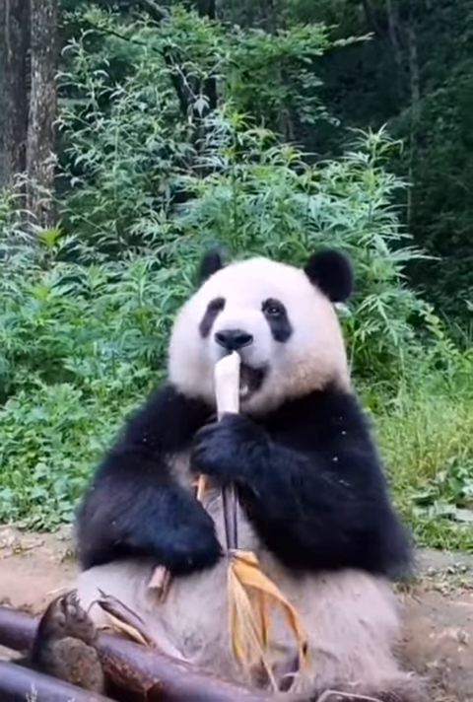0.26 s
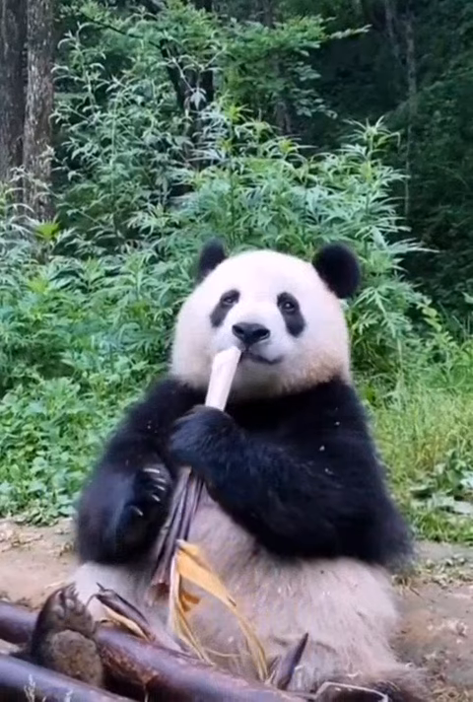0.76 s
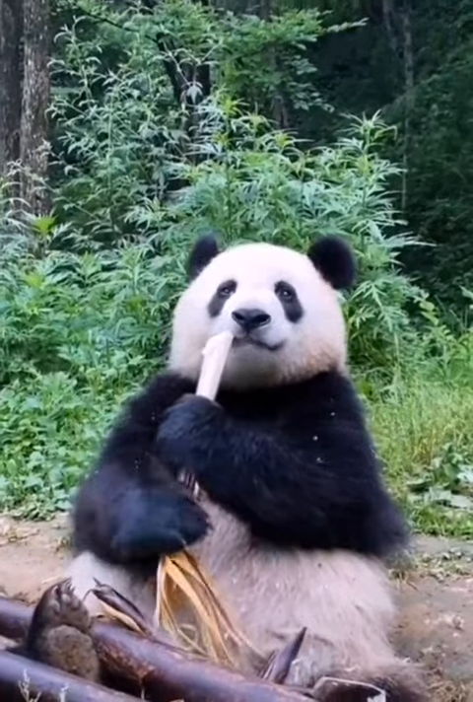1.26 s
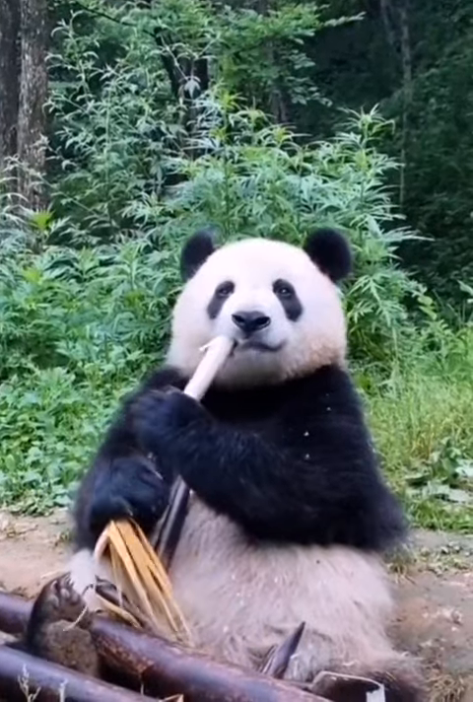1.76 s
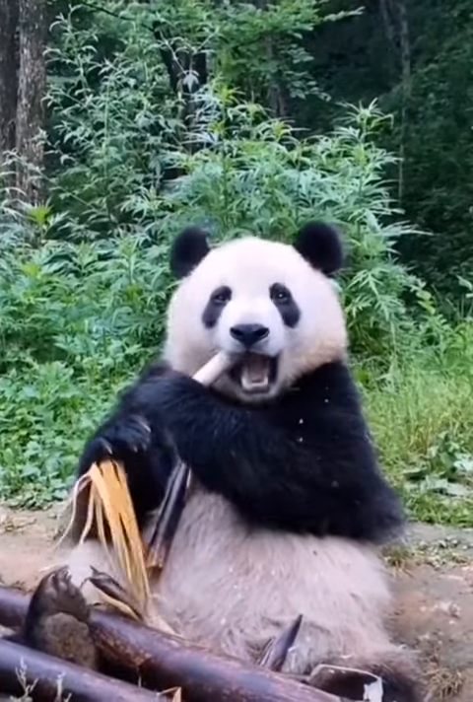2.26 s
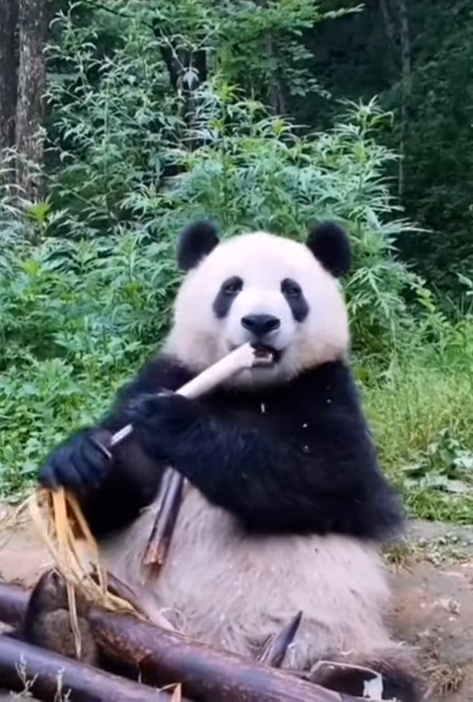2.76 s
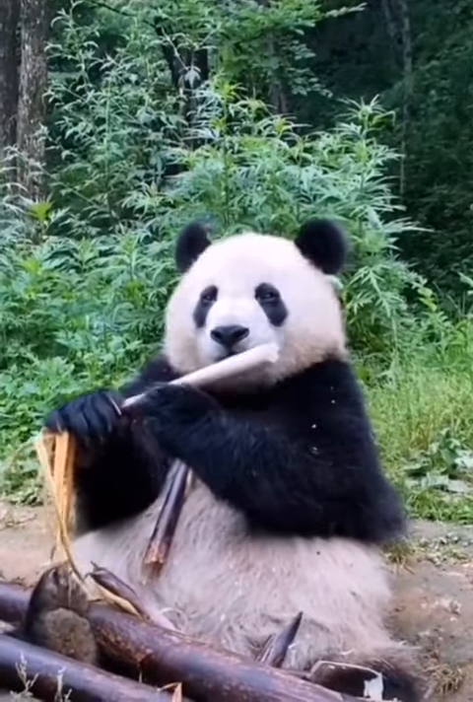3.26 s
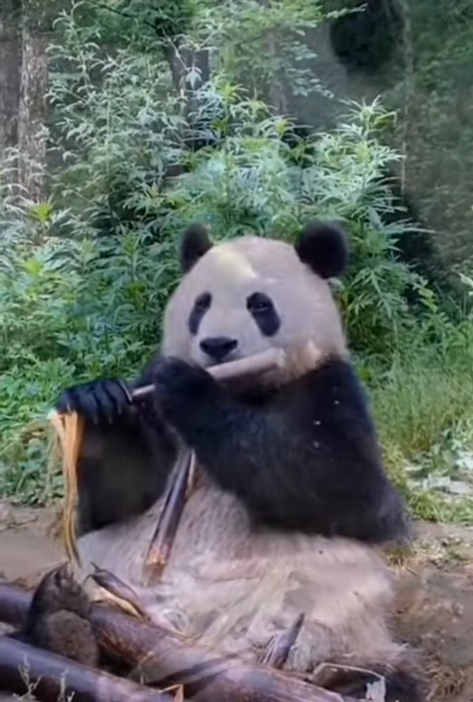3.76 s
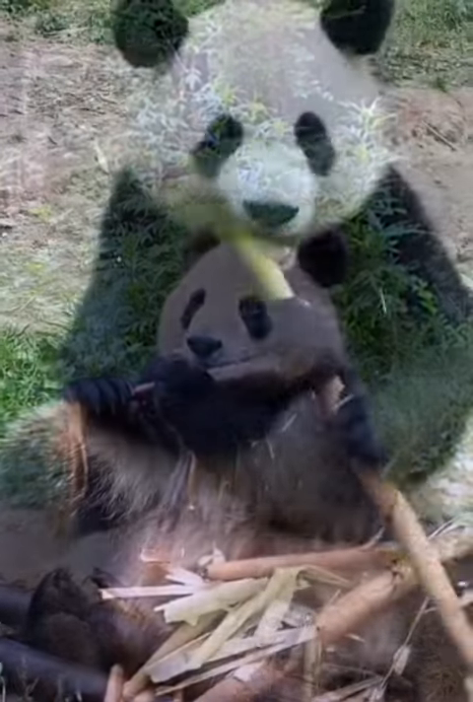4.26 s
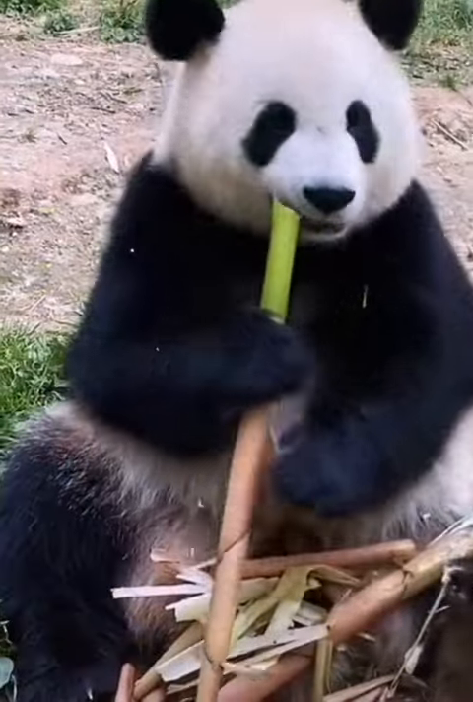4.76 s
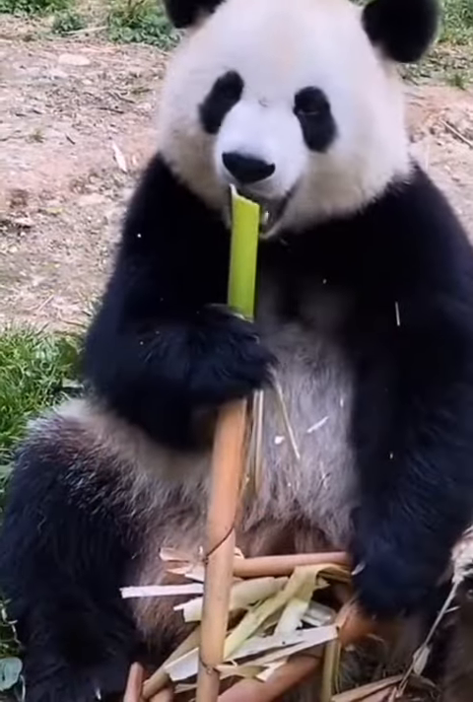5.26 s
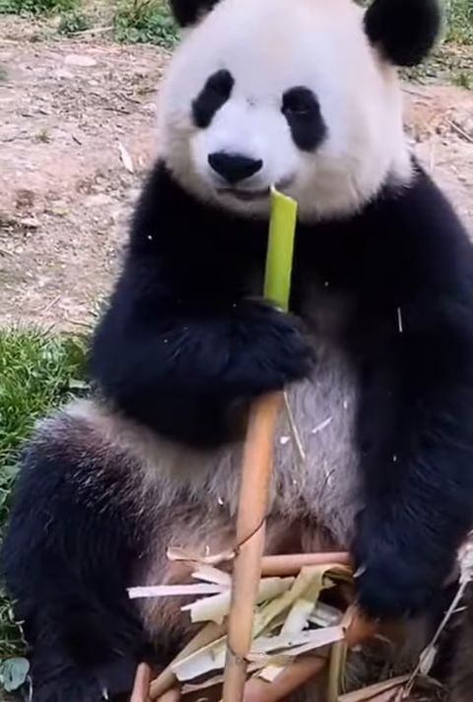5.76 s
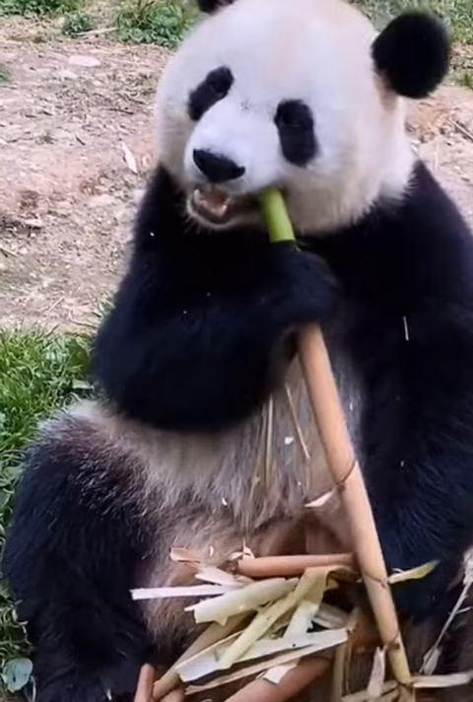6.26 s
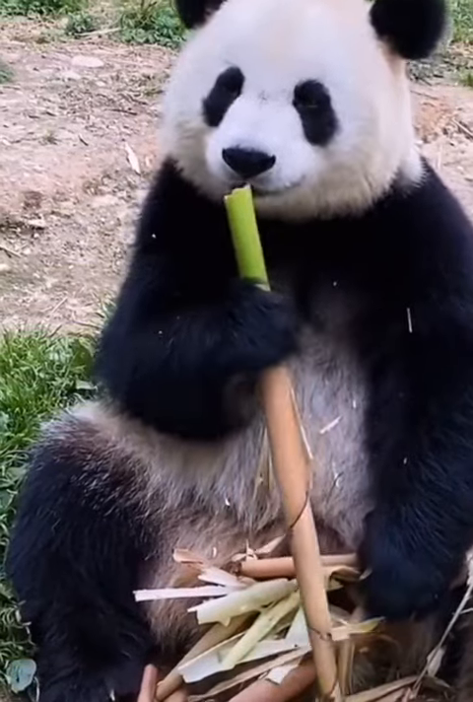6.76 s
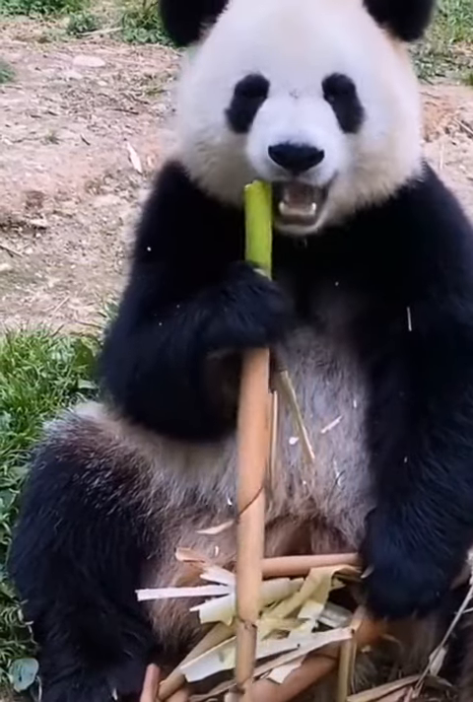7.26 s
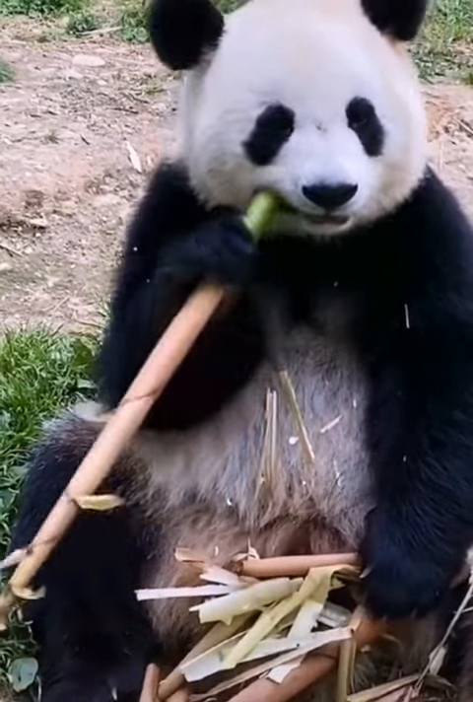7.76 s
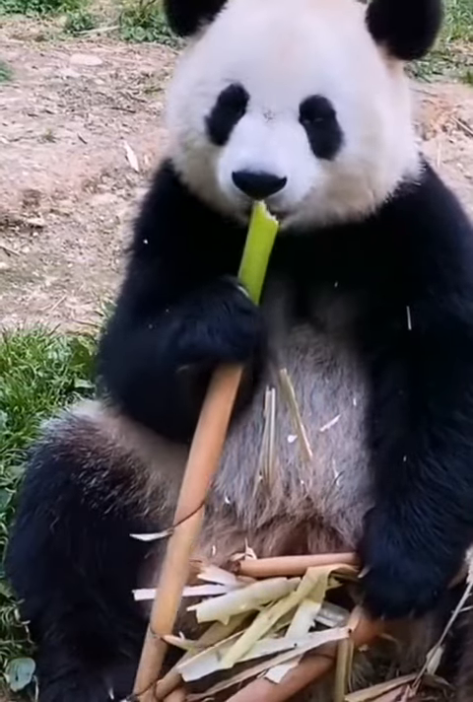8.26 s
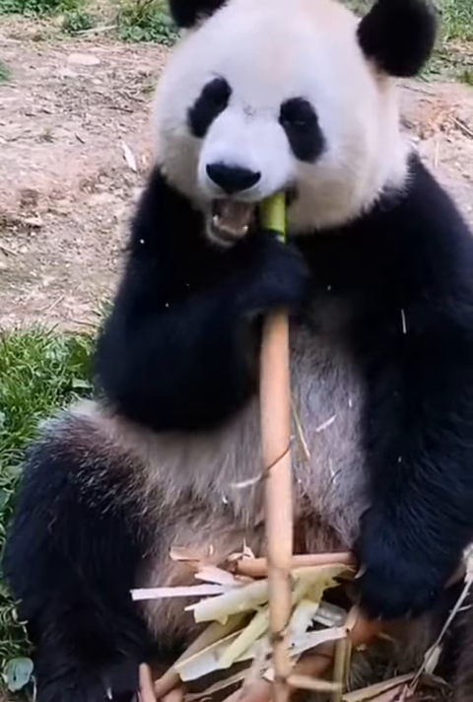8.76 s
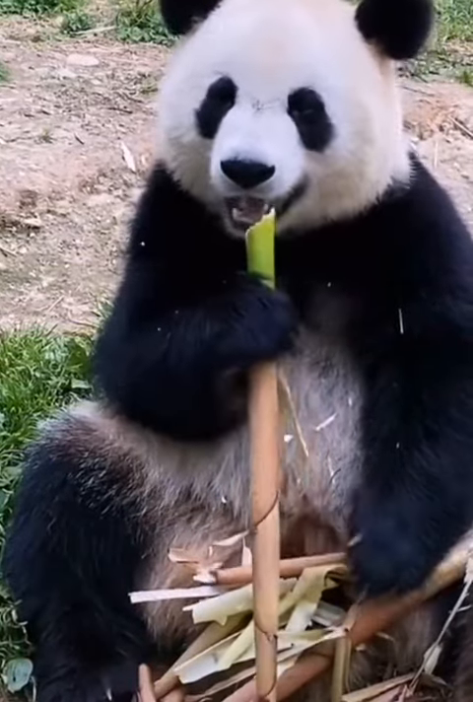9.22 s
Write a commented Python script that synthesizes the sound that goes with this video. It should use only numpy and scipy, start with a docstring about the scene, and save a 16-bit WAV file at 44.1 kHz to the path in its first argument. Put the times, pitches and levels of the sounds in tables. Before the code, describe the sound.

Close, dry snapping and splintering of bamboo in a panda's jaws, with faint wet munching, brief nose puffs, and a deep boom midway.

```python
"""Outdoor hiss opens the scene as filtered noise; at once a panda bites and chews bamboo close by.
Torn fibres and snaps are impulse clusters exciting the resonances of stalk, mouth and splinters.
Low rumbles, noise under swelling and decaying envelopes, begin within the first half second.
Nose puffs (low noise) follow until about 4 s, with faint hollow tones (wavering sinusoids) at times.
The hiss sinks near 2 s and returns stronger; the loudest rumbles come after 5.6 s, as chewing goes on."""
import sys
import numpy as np
from scipy import signal
from scipy.fft import rfft, irfft, next_fast_len
from scipy.io import wavfile
from scipy.ndimage import uniform_filter1d

SR = 44100
rng = np.random.default_rng(int(sys.argv[2]) if len(sys.argv) > 2 else 0)


def waveform_to_disk(signal):
    """Save audio, clipped to [-1, 1], as 16-bit WAV at the path in sys.argv[1]."""
    frames = np.transpose(np.atleast_2d(signal))
    scaled = np.clip(frames, -1, 1) * 32767
    samples = np.round(scaled).astype(np.int16)
    wavfile.write(sys.argv[1], SR, samples)


N = 418509
LEFT_RIGHT = np.array([[1], [-1]])  # opposite polarity in the two channels: sound at the sides


def undb(db):
    """Logarithmic level: decibels to amplitude gain."""
    return 10 ** (np.asarray(db) / 20)


def unit(x):
    """Power normalisation: scale to rms 1."""
    return x / np.sqrt(np.mean(x ** 2) + 1e-20)


def curve(rows):
    """Envelope: gain interpolated in dB through (time [s], level [dB]); silent outside the rows."""
    times, levels = np.transpose(rows)
    level_db = np.interp(np.arange(N) / SR, times, levels, -120, -120)
    return uniform_filter1d(undb(level_db), size=256)


def colour(x, points):
    """Minimum-phase filtering through (frequency [Hz], gain [dB]), by folding the cepstrum."""
    n = 2 * next_fast_len(len(x) // 2 + 1)
    hz, db = np.transpose(points)
    log_hz = np.log(np.maximum(np.arange(n // 2 + 1) * SR / n, 1))
    beyond = np.abs(log_hz - np.clip(log_hz, np.log(hz.min()), np.log(hz.max())))
    log_gain = np.log(undb(np.interp(log_hz, np.log(hz), db)))
    log_gain = log_gain - np.minimum(4 * beyond, 8)  # roll off outside the points
    cepstrum = irfft(log_gain)
    cepstrum[1:n // 2] *= 2
    cepstrum[n // 2 + 1:] = 0
    return irfft(rfft(x, n) * np.exp(rfft(cepstrum)))[:len(x)]


def ring(x, hz, width_hz):
    """Damped resonance: a second-order peak with gain 1 at its centre."""
    b, a = signal.iirpeak(hz, hz / width_hz, fs=SR)
    return signal.lfilter(b, a, x)


def sweep(x, hz, width_hz):
    """Moving resonance: shift the centre to 0 Hz, low-pass, shift back; gain 1 at the centre."""
    turn = np.exp(2j * np.pi * np.cumsum(hz) / SR)
    keep = np.exp(-np.pi * width_hz / SR)
    smoothed = signal.lfilter([1 - keep], [1, -keep], x * turn.conj())
    return 2 * (turn * smoothed).real


def noise(points):
    """Spectral shaping: white noise coloured, then set to rms 1."""
    return unit(colour(rng.standard_normal(N), points))


def walk(rate):
    """Slow random modulation of rms 1; rate is in steps per second."""
    step = max(int(SR / rate), 1)
    held = np.repeat(rng.standard_normal(N // step + 1), step)
    return unit(uniform_filter1d(held, step)[:N])


def add(out, x, start):
    """Superposition: mix x into out from the time start."""
    i = int(round(start * SR))
    x = x[max(-i, 0):max(N - i, 0)]
    out[max(i, 0):max(i, 0) + len(x)] += x


# still air: (frequency [Hz], gain [dB])
AIR_SPECTRUM = [(25, -8), (60, 3.5), (100, 7), (180, 4.5), (260, -4.5), (480, -2), (750, -25), (4200, -32),
                (6300, -71), (7600, -49), (9500, -24.5), (15000, -38)]
AIR_DB = -46
# central hiss: (frequency [Hz], gain [dB])
HISS_SPECTRUM = [(21, -28), (35, -39), (59, 3), (91, -5.5), (253, -1), (314, -6.5), (426, -4.5),
                 (507, -4.5), (553, -5.5), (717, -6), (931, -5), (1130, -8.5), (1230, -6), (6300, -14.5),
                 (8190, -102), (13900, -120)]
# hiss at the sides: (frequency [Hz], gain [dB]), and its level against the central hiss
WIDE_SPECTRUM = [(100, -31), (250, -4.5), (450, 10), (1000, 7), (1900, 4.5), (2600, -35), (5000, -54),
                 (6300, -6), (8000, -28)]
HISS_WIDE_DB = -15.5
# envelope of the central and wide hiss: (time [s], level [dB])
HISS_ENVELOPE = [(0, -42.5), (.6, -40.5), (1.2, -45.5), (1.8, -47), (1.92, -54.5), (2.06, -53), (2.2, -60),
                 (2.35, -36), (2.5, -45.5), (3.33, -46.5), (3.5, -36.5), (3.7, -33.5), (3.725, -45),
                 (3.77, -39), (4.17, -36.5), (4.4, -37), (4.7, -36.5), (5.05, -39), (5.5, -35), (5.85, -42),
                 (6.15, -40), (6.4, -35.5), (7.05, -37.5), (7.7, -36.5), (8.9, -37), (9.49, -40)]
# airy top: (frequency [Hz], gain [dB])
TOP_SPECTRUM = [(5500, -23), (6200, -10), (6900, 22), (7500, 0.5), (8400, -9), (9600, 15.5), (12000, 14),
                (14500, 7.5), (16000, -39)]
# envelope of the top, before TOP_DB: (time [s], level [dB])
TOP_ENVELOPE = [(0, -54), (.6, -59), (.95, -75), (1.5, -58), (2, -75), (2.3, -39), (2.6, -60), (3.45, -73),
                (3.8, -58), (5.2, -62), (6.1, -62), (6.6, -53.5), (7.1, -51), (7.55, -60.5), (8.1, -53.5),
                (8.5, -53), (8.68, -61), (9.1, -53), (9.49, -57)]
# added swells of the top, before TOP_DB: (middle [s], length [s], peak level [dB])
TOP_SURGES = [(2.72, .14, -54), (3.16, .18, -58), (3.4, .05, -43), (3.84, 0.1, -63), (4.26, 0.22, -45),
              (4.69, .16, -48), (5.85, 0.16, -56), (6.35, 0.27, -50), (6.48, 0.13, -44.5),
              (6.88, 0.35, -54), (7.67, .08, -36), (7.93, 0.23, -47), (8.97, .16, -43.5)]
TOP_DB = -2.0


def outdoors():
    """Broadband noise: steady air, a wavering hiss, an airy top; opposite-polarity parts give width."""
    air = undb(AIR_DB) * noise(AIR_SPECTRUM)
    waver = undb(.9 * walk(7) + .7 * walk(45))
    hiss = noise(HISS_SPECTRUM) * waver + undb(HISS_WIDE_DB) * noise(WIDE_SPECTRUM) * LEFT_RIGHT
    top = noise(TOP_SPECTRUM) + undb(-1.0) * noise(TOP_SPECTRUM) * LEFT_RIGHT
    top = top * undb(1.2 * walk(16))
    top_gain = curve(TOP_ENVELOPE)
    for middle, length_s, db in TOP_SURGES:
        surge = undb(db) * signal.windows.hann(max(int(length_s * SR), 64))
        add(top_gain, surge, middle - length_s / 2)
    return air + hiss * curve(HISS_ENVELOPE) + top * top_gain * undb(TOP_DB)


def fibres(count, per_s, scatter_db):
    """Random impulse process: lone snaps at chance moments, many small and a few large."""
    chance, size, sign = rng.random((3, count))
    strength = undb(-scatter_db * np.log(np.maximum(size, .02)))
    return (chance < per_s / SR) * strength * np.sign(sign - .5)


# body of the stalk: (frequency [Hz], gain [dB])
STALK_COLOUR = [(600, -6.5), (1100, -29.5), (1500, 4), (2900, 3), (3700, -6.5), (6000, -43.5)]
# cavity of the mouth: (frequency [Hz], gain [dB])
MOUTH_COLOUR = [(120, -24), (300, -13), (450, -5), (700, 0), (1200, 0), (1600, -9), (3000, -34)]
# splinters: (frequency [Hz], gain [dB])
SPLINTER_COLOUR = [(2000, -3), (3300, -1.5), (5000, 1), (6400, -4), (6800, -4), (8200, -13.5), (9600, -7.5),
                   (12500, -5.5), (16000, -16)]
# how far the stalk's pitch and the splinters' strength follow the bend (exponents)
STALK_FOLLOW, SPLINTER_FOLLOW = 1, 0.47


def bite(snaps, seconds, bend, stalk_db, stalk_hz, mouth_db, mouth_hz, splinter_db, splinter_hz,
         stalk_width_hz, mouth_width_hz, splinter_width_hz, dry):
    """Source and resonators: snaps excite stalk, mouth and splinters; levels are rms over `seconds`."""
    stalk = sweep(snaps, stalk_hz * bend ** STALK_FOLLOW, stalk_width_hz) + dry * snaps
    mouth = sweep(snaps, mouth_hz * bend, mouth_width_hz) + dry * snaps
    # four more splinters of chance length
    other_hz = 3450 + 750 * (np.arange(4) + rng.random(4))
    others = sum(ring(snaps, hz, splinter_width_hz) for hz in other_hz)
    splinters = ring(snaps, splinter_hz, splinter_width_hz) + 0.39 * others + 0.085 * snaps
    mix = undb(stalk_db) * unit(colour(stalk, STALK_COLOUR))
    mix += undb(mouth_db) * unit(colour(mouth, MOUTH_COLOUR))
    mix += undb(splinter_db) * unit(colour(splinters * bend ** SPLINTER_FOLLOW, SPLINTER_COLOUR))
    return mix * np.sqrt(seconds * SR / len(snaps))


# strokes of the jaw: (start [s], end [s], stalk level [dB], stalk resonance [Hz], mouth level [dB],
# mouth resonance [Hz], splinter level [dB], hardest moment [share of stroke], resonance slide [octaves]);
# levels are before each layer's overall gain
JAW_STROKES = [(0.057, 0.081, -24.5, 1930, -43, 1250, -40, 0.45, -1.0),
               (0.071, 0.106, -35.5, 1700, -33, 870, -30.5, 0.28, -0.071),
               (0.212, 0.363, -35, 2350, -31.5, 980, -39.5, 0.6, -0.42),
               (0.448, 0.508, -31.5, 1680, -39, 1040, -51, 0.53, -0.035),
               (.545, 0.713, -39.5, 2230, -35, 920, -47, 0.59, 0.19),
               (0.824, 0.887, -28, 2010, -29, 1110, -33, 0.33, -0.44),
               (0.999, 1.071, -31.5, 2100, -26, 1070, -38.5, 0.38, -0.011),
               (1.055, 1.138, -38, 1900, -33, 1120, -56, 0.33, -0.16),
               (1.282, 1.34, -31.5, 1580, -40, 1010, -36, 0.58, 1),
               (1.466, 1.526, -40, 2100, -38.5, 1075, -41, 0.52, 0.18),
               (1.528, 1.632, -36.5, 1950, -34, 1010, -43.5, 0.41, -1.15),
               (1.689, 1.833, -39.5, 2210, -63, 1200, -44, 0.17, -0.33),
               (2.229, 2.309, -29, 1630, -33.5, 1120, -25, 0.92, -0.09),
               (2.293, 2.35, -20.5, 1940, -30, 1025, -27, .6, -0.24),
               (2.324, 2.403, -25.5, 2400, -35, 1000, -22, 0.24, 0.36),
               (2.658, 2.783, -30.5, 2040, -34, 1060, -37.5, 0.44, -0.0097),
               (2.736, 2.821, -34.5, 1800, -33, 715, -46, 0.35, -1.5),
               (2.894, 2.988, -33, 2200, -36, 800, -43, 0.57, 0.36),
               (3.078, 3.175, -39.5, 2130, -40, 1140, -33, 0.68, -0.52),
               (3.137, 3.251, -31.5, 1880, -37.5, 1120, -34.5, 0.34, -0.69),
               (3.365, 3.42, -38.5, 1920, -50, 700, -38, 1, -0.8),
               (3.45, 3.5, -35, 2000, -38, 900, -52, 0.33, -0.23),
               (3.493, 3.66, -36.5, 1820, -41, 860, -44.5, 0.36, -0.14),
               (3.658, 3.712, -32.5, 1580, -50, 1100, -36.5, 0.31, 0),
               (3.742, 3.774, -27.5, 2740, -51, 1000, -42, 0.36, -0.1),
               (3.784, 3.865, -32.5, 1670, -41, 1330, -39.5, 0.46, 0.87),
               (3.923, 3.993, -31.5, 1850, -32.5, 1300, -36, 0.38, 0.29),
               (4.003, 4.077, -34.5, 1400, -35.5, 1330, -44, 0.4, -0.073),
               (4.156, 4.2, -34.5, 1740, -33, 1210, -40, 0.54, -1.2),
               (4.214, 4.314, -38.5, 1610, -61, 1210, -33, 0.45, 0.27),
               (4.469, 4.518, -23, 1480, -20.5, 1320, -43, 0.5, -0.38),
               (4.505, 4.574, -21, 1710, -27, 1150, -30.5, 0.71, 0.36),
               (4.859, 4.94, -30.5, 2250, -35, 905, -33, 0.35, -0.71),
               (5.022, 5.051, -33.5, 2200, -47, 1100, -32.5, 0.44, 0.35),
               (5.073, 5.166, -35, 2200, -32.5, 1190, -48, 0.15, 0.34),
               (5.257, 5.325, -31.5, 2080, -37, 1290, -47, 0.55, 0),
               (5.457, 5.5, -28, 2530, -28, 720, -32, 0.57, 0.84),
               (5.549, 5.74, -37, 2560, -37, 940, -39.5, 0.51, 0),
               (6.185, 6.297, -25, 1910, -30, 840, -34, 0.46, -0.1),
               (6.549, 6.64, -31.5, 2050, -34, 690, -51, 0.46, -0.35),
               (6.857, 6.93, -32.5, 2100, -28, 990, -41, 0.46, 0.0091),
               (7.181, 7.24, -31.5, 2320, -36, 1050, -38, 0.32, 0.026),
               (7.247, 7.308, -32.5, 2300, -40, 950, -41, 0.18, -0.93),
               (7.593, 7.664, -30, 2330, -23, 1000, -35, 0.92, -0.65),
               (7.661, 7.71, -26, 2170, -25.5, 885, -31, 0.21, -1.2),
               (7.98, 8.041, -31.5, 2680, -30, 1090, -35, 0.17, -0.029),
               (8.28, 8.377, -32.5, 2260, -34, 1270, -36.5, 0.29, -0.18),
               (8.73, 8.806, -30.5, 2500, -24, 860, -40, 0.62, -0.34),
               (8.785, 8.86, -22.5, 2140, -27, 784, -23.5, 0.56, -0.11),
               (9.211, 9.287, -31, 2160, -32, 820, -36, 0.51, -0.08),
               (9.409, 9.455, -32, 1500, -28, 790, -36.5, 0.46, -0.56)]
SPLINTER_RANGE_HZ = 2980, 5970  # ring of a main splinter of chance length
CRUNCH_DB = -5.5


def crunches():
    """Pressure-driven fracture: fibres tear in uneven spurts, more in louder strokes, as resonances slide."""
    out = np.zeros(N)
    spurts = undb(2.3 * walk(170))
    for start, end, stalk_db, *tone, peak, slide in JAW_STROKES:
        n = max(int((end - start) * SR), 64)
        count = n + 1024  # room to ring out
        progress = np.arange(count) / n
        ramp = np.interp(progress, [0, np.clip(peak, .1, .9), 1], [0, 1, 0])
        pressure = np.sin(np.pi / 2 * ramp)
        snaps = fibres(count, per_s=2000 * undb(stalk_db + 35.5), scatter_db=3.0)
        snaps = snaps * pressure * spurts.take(int(start * SR) + np.arange(count), mode="wrap")
        bend = 2 ** (slide * (np.minimum(progress, 1) - .5))
        tear = bite(snaps, n / SR, bend, stalk_db, *tone, rng.uniform(*SPLINTER_RANGE_HZ),
                    stalk_width_hz=310, mouth_width_hz=92, splinter_width_hz=300, dry=0.34)
        add(out, tear, start)
    return out * undb(CRUNCH_DB)


# wet ticks: (frequency [Hz], gain [dB])
PULP_COLOUR = [(400, -14), (1100, 0), (2500, 0), (6000, -8), (7200, -32), (15000, -36)]


def munching():
    """Burst excitation: faint wet ticks of pulp and lips, tiny noise bursts clustered around the strokes."""
    t = np.arange(N) / SR
    strokes = sum(1. * ((t > start) & (t < end)) for start, end, *_ in JAW_STROKES)
    jaw_moving = uniform_filter1d(strokes, size=SR // 6)
    burst = np.exp(-t[:400] / .0015)
    envelope = signal.fftconvolve(fibres(N, per_s=70, scatter_db=3.0), burst)[:N]
    ticks = envelope * rng.standard_normal(N) * jaw_moving
    return undb(-50.0) * unit(colour(ticks, PULP_COLOUR))


# build-up and decay times as shares of a snap's length; main break against the cluster's strength
BUILD, DIE, MAIN_SNAP = .7, .8, .55
# the ring sags by this much (octaves) over about this time (s)
SAG_OCTAVES, SAG_S = 0.16, 0.024
# stalk bandwidth (Hz), and the damping that is divided by the snap's length
STALK_WIDTH_HZ, SNAP_DAMPING = 70, .2


def crack(length_s, *tone):
    """Brittle fracture: small snaps lead to a main one and crumble away; returns sound and lead [s]."""
    lead, count = 600, 2048
    t = (np.arange(count) - lead) / SR
    cluster = np.exp(np.where(t < 0, t / BUILD, -t / DIE) / length_s)
    cluster += .04 * (t > 0) * np.exp(-np.abs(t) / .012)  # sparse crumbling tail
    snaps = fibres(count, per_s=4500, scatter_db=2.4) * cluster
    snaps[lead] += MAIN_SNAP * np.linalg.norm(snaps)
    bend = 2 ** (-SAG_OCTAVES / 2 * np.tanh(t / SAG_S))
    # abrupt breaks ring shortest
    stalk_width_hz = STALK_WIDTH_HZ + SNAP_DAMPING / length_s
    sound = bite(snaps, 1 / 100, bend, *tone,
                 stalk_width_hz=stalk_width_hz, mouth_width_hz=82, splinter_width_hz=170, dry=0.056)
    return sound, lead / SR


# distinct snaps: (time [s], length [s], stalk level [dB], stalk resonance [Hz], mouth level [dB],
# mouth resonance [Hz], splinter level [dB], splinter resonance [Hz]);
# levels are rms over 10 ms, before CRACK_DB
STALK_SNAPS = [(0.067, 0.0053, -20, 1880, -25, 1260, -29, 6230),
               (0.071, 0.0008, -23, 1480, -13, 990, -27.5, 4950),
               (0.097, 0.0031, -33, 1780, -26, 850, -37, 4460),
               (0.4512, 0.0014, -20, 1600, -27.5, 1030, -17.5, 4360),
               (0.454, 0.0018, -24, 1500, -44, 1210, -34, 4400),
               (0.4825, 0.0032, -31, 1800, -36, 597, -30, 5030),
               (0.491, 0.0088, -23, 2020, -30, 1300, -31, 4300),
               (0.68, 0.0028, -34, 2360, -37.0, 910, -37, 4860),
               (0.757, 0.0032, -40, 2920, -44, 450, -39.5, 3500),
               (0.839, 0.0048, -12, 1995, -36, 1290, -28.5, 5000),
               (0.849, 0.003, -18, 1980, -25.5, 1080, -36, 4360),
               (1.043, 0.004, -27, 2180, -22.5, 1115, -31.5, 5100),
               (1.1744, 0.002, -37, 2170, -52.0, 450, -40, 5000),
               (1.243, 0.0029, -38, 1920, -38, 530, -38.5, 3900),
               (1.296, 0.0034, -36, 1450, -26.5, 1160, -42, 5200),
               (1.3112, 0.0076, -15, 1320, -18, 990, -27, 4060),
               (1.4825, 0.0029, -30.5, 1960, -30, 1150, -29, 4430),
               (1.4954, 0.002, -29, 3110, -38, 1130, -23.5, 4860),
               (1.5216, 0.003, -36, 1500, -51, 970, -30.5, 4950),
               (1.573, 0.0039, -44, 1990, -29, 1140, -54, 4100),
               (1.647, 0.0024, -36.5, 3300, -56, 450, -49, 3300),
               (1.661, 0.0014, -37, 1980, -52, 1100, -49, 3420),
               (1.702, 0.0012, -31, 2770, -45, 1290, -47, 4070),
               (1.713, 0.0015, -28.5, 2180, -37.5, 1250, -37, 3770),
               (1.782, 0.0013, -23.5, 2260, -35, 1340, -33.5, 4020),
               (1.826, 0.0073, -35.5, 2600, -37, 1010, -35, 5150),
               (2.276, 0.0052, -26, 1650, -41, 1040, -34, 5400),
               (2.306, 0.006, -22, 1940, -30, 1080, -17.5, 3880),
               (2.3117, 0.0015, -28, 2370, -32, 1090, -18, 3770),
               (2.321, 0.0047, -18, 2050, -25, 1080, -18, 3450),
               (2.3285, 0.0034, -15.5, 2020, -38, 1120, -18, 3320),
               (2.34, 0.003, -19, 2580, -45, 1080, -17, 3480),
               (2.351, 0.0019, -22, 2290, -39, 1310, -16.5, 5860),
               (2.3633, 0.0056, -18, 2550, -33.5, 543, -15, 3400),
               (2.3685, 0.0012, -19, 2800, -52, 1060, -22, 5130),
               (2.375, 0.00083, -26, 2580, -47.5, 720, -21, 5400),
               (2.3978, 0.00087, -38, 2300, -44, 1220, -24, 5750),
               (2.4016, 0.0039, -23, 2100, -47, 1240, -20.5, 5270),
               (2.406, 0.0022, -21, 2780, -52, 1170, -21.5, 3820),
               (2.411, 0.0015, -35, 2540, -29, 430, -31, 4430),
               (2.679, 0.0066, -33, 2060, -43, 900, -51, 3640),
               (2.831, 0.0031, -44, 1910, -47, 490, -39.5, 4800),
               (2.88, 0.0075, -36, 1460, -43.0, 450, -38, 3490),
               (2.9076, 0.0039, -30, 1590, -39, 450, -51.0, 3300),
               (2.939, 0.0069, -28, 1940, -33, 660, -33, 4500),
               (2.959, 0.002, -27.5, 2450, -37, 614, -33, 3540),
               (2.987, 0.003, -35, 1400, -32, 450, -44.5, 3300),
               (3.193, 0.0033, -31, 1630, -54, 1070, -32, 4730),
               (3.375, 0.0039, -31.5, 1650, -36, 467, -41, 3500),
               (3.417, 0.0035, -24.5, 2420, -20.5, 560, -44, 3720),
               (3.458, 0.004, -32, 2280, -33, 920, -34, 3460),
               (3.526, 0.0069, -32, 1900, -37.5, 1130, -36.5, 3760),
               (3.678, 0.0058, -33, 1530, -40, 1220, -31.5, 4200),
               (3.759, 0.0076, -35, 2780, -33, 860, -30, 5950),
               (3.7908, 0.0017, -32, 1670, -42, 1290, -43.5, 4100),
               (3.7943, 0.0016, -14.5, 1600, -19, 1410, -40, 3700),
               (4.184, 0.0013, -25.5, 1440, -31, 1270, -49, 3850),
               (4.491, 0.00093, -13, 1410, -20.5, 1070, -30.5, 4340),
               (4.55, 0.0077, -20.5, 1560, -38, 450, -26.5, 3300),
               (4.559, 0.0051, -22, 2360, -40, 460, -25, 5540),
               (4.8905, 0.0029, -24.5, 1990, -31, 970, -24.5, 3840),
               (4.918, 0.004, -29, 1930, -42, 1000, -47, 3900),
               (5.027, 0.0091, -26.5, 3140, -48, 1060, -37, 4430),
               (5.096, 0.0042, -20.5, 1420, -28, 1300, -27.5, 5040),
               (5.109, 0.0082, -24, 2770, -33, 760, -38, 3700),
               (5.468, 0.008, -27.5, 1490, -20.5, 710, -49, 5030),
               (5.4877, 0.0035, -23, 2090, -30, 454, -34, 3780),
               (5.582, 0.01, -33.0, 2600, -41, 450, -26, 3400),
               (5.718, 0.012, -31, 1360, -17.5, 814, -33, 3320),
               (6.2226, 0.0028, -32, 2070, -40, 800, -29, 4700),
               (6.236, 0.0044, -28, 2020, -31, 800, -33, 5230),
               (6.251, 0.0025, -20.5, 2000, -30, 450, -29.5, 5340),
               (6.2576, 0.004, -27, 2030, -43, 800, -29, 5370),
               (6.603, 0.0054, -26.5, 2020, -43, 710, -35, 4560),
               (6.76, 0.0031, -32, 2020, -50, 450, -43, 3340),
               (6.778, 0.0048, -27.5, 1910, -40, 470, -43, 3960),
               (6.8349, 0.0023, -38, 2160, -48, 900, -46, 4000),
               (6.895, 0.008, -32, 2060, -34, 1020, -33, 3310),
               (6.908, 0.0022, -30, 2100, -49, 1000, -41, 4000),
               (7.138, 0.0054, -28.5, 2000, -41.0, 770, -43, 5370),
               (7.183, 0.0018, -29.5, 2110, -27.5, 1060, -40, 4230),
               (7.205, 0.0039, -28, 2880, -39, 1010, -41, 3370),
               (7.2517, 0.0035, -21, 2120, -46, 930, -32, 4230),
               (7.311, 0.014, -30, 1490, -28, 960, -37, 3730),
               (7.473, 0.001, -34.5, 2960, -53, 460, -48, 3370),
               (7.637, 0.0014, -22, 2550, -38, 1090, -32, 5470),
               (7.642, 0.0021, -26, 2450, -19.5, 1055, -31, 3730),
               (7.67, 0.0041, -14.5, 2220, -26, 760, -23, 4300),
               (7.676, 0.003, -25, 2320, -31, 800, -31, 5040),
               (7.686, 0.0018, -25, 1880, -22.5, 765, -26.5, 3660),
               (7.807, 0.0022, -35, 2220, -47, 1000, -50, 4000),
               (7.848, 0.0024, -35, 1610, -52, 1000, -53, 4000),
               (7.991, 0.008, -21.5, 2280, -26, 1226, -28.5, 3380),
               (8.245, 0.0026, -23.5, 2280, -28.5, 1480, -32.5, 3370),
               (8.323, 0.0038, -28.5, 2880, -41, 1260, -37, 3420),
               (8.469, 0.0027, -39, 2070, -50, 900, -34, 5700),
               (8.557, 0.003, -32, 1500, -40, 1150, -40, 4000),
               (8.6044, 0.006, -30, 2700, -47, 870, -31, 3640),
               (8.7803, 0.0018, -16, 2800, -19.5, 810, -27, 3300),
               (8.794, 0.0032, -20, 2180, -25, 990, -25, 4200),
               (8.8336, 0.0028, -25, 2210, -24.5, 800, -25, 4600),
               (8.848, 0.002, -31, 2120, -31, 810, -29, 5600),
               (8.967, 0.0043, -38, 2970, -41, 900, -42, 4630),
               (9.42, 0.0023, -28, 1430, -27.5, 800, -45, 4600)]
CRACK_DB = -2


def cracks():
    """Impulsive fracture: distinct snaps, from single sharp breaks to short crumbling clusters."""
    out = np.zeros(N)
    for moment, length_s, *tone in STALK_SNAPS:
        sound, lead_s = crack(length_s, *tone)
        add(out, sound, moment - lead_s)
    return out * undb(CRACK_DB)


# lesser snaps: level over the stroke's own and its scatter (dB), length (s)
SMALL_CRACK_DB, SMALL_SCATTER_DB, SMALL_CRACK_S = -13.5, 4, 0.00055


def small_cracks(count):
    """Random fracture: `count` lesser snaps at chance moments of each stroke, in its colour."""
    out = np.zeros(N)
    for start, end, *tone, _, _ in JAW_STROKES:
        for moment, strength in zip(rng.beta(3, 3, count), rng.standard_normal(count)):
            sound, lead_s = crack(SMALL_CRACK_S, *tone, rng.uniform(*SPLINTER_RANGE_HZ))
            snap_time = start + moment * (end - start)
            add(out, sound * undb(SMALL_SCATTER_DB * strength), snap_time - lead_s)
    return out * undb(SMALL_CRACK_DB)


def roll(points, steady_s):
    """Power levelling: low rolling noise whose strength is evened over steady_s."""
    x = noise(points)
    power = uniform_filter1d(x ** 2, max(int(steady_s * SR), 1))
    return x / np.sqrt(power + 0.019)


# deep rumble: (frequency [Hz], gain [dB])
DEEP_SPECTRUM = [(13, 0), (22, -12), (39, -19), (59, 8), (78, 1), (130, -19.5), (162, -14.5), (189, -31),
                 (260, -30), (340, -33.5), (570, -120)]
# boom: (frequency [Hz], gain [dB])
BOOM_SPECTRUM = [(15, -26), (25, -23), (43, -13), (59, -3), (86, -6.5), (119, -10), (145, 2.5), (200, -6),
                 (250, 1), (275, -0.5), (305, -16.5), (336, -11), (420, -24), (550, -26), (920, -120)]
# roar mixed into a boom: (frequency [Hz], gain [dB])
ROAR_SPECTRUM = [(250, -32), (380, -0.5), (700, -1), (850, -3.5), (1000, -12), (1400, -12.5), (2000, -33)]
# faint rumble: (frequency [Hz], gain [dB])
FAINT_SPECTRUM = [(15, -53), (25, -32), (45, -9), (59, 10.5), (70, 0), (109, 5), (145, -14), (204, -8.5),
                  (244, -18.5), (300, -38), (390, -48), (660, -120)]
# distant rumbles: (start [s], level before the kind's own gain [dB], hold [s], fall [dB/s], kind)
DISTANT_RUMBLES = [(0.299, -19.5, 0.18, 19.5, "deep"), (3.404, -48.5, 1, 26, "deep"),
                   (5.626, -16.5, 0.5, 17.5, "boom"), (5.657, -12, 0.0091, 264, "boom"),
                   (7.47, -30.5, 0.044, 25.5, "boom"), (8.29, -30, 0.23, 87, "faint")]
RUMBLE_ATTACK_S, ROAR_DB = 0.067, -13.5


def rumbles():
    """Exponential decay: low noise swells quickly, holds, then falls evenly in dB; booms carry a roar."""
    t = np.arange(N) / SR

    def rolling(kind):
        """Band-limited noise of one kind, drawn afresh for each rumble."""
        if kind == "deep":
            return roll(DEEP_SPECTRUM, steady_s=0.038) * undb(3.5)
        if kind == "boom":
            boom = roll(BOOM_SPECTRUM, steady_s=0.076) * undb(-0.85)
            return boom + noise(ROAR_SPECTRUM) * undb(ROAR_DB)
        return roll(FAINT_SPECTRUM, steady_s=0.084) * undb(0.7)

    out = np.zeros(N)
    for start, db, hold_s, fall_db_per_s, kind in DISTANT_RUMBLES:
        swell = np.clip((t - start) / RUMBLE_ATTACK_S, 0, 1) ** 2
        falling_s = np.maximum(t - start - RUMBLE_ATTACK_S - hold_s, 0)
        out += rolling(kind) * swell * undb(db - fall_db_per_s * falling_s)
    return out * undb(1.0 * walk(16))


# puffs through the nose: (start [s], length [s], level [dB])
NOSE_PUFFS = [(0.5, 0.27, -27.5), (1.283, 0.23, -27), (2.097, 0.25, -25), (2.741, 0.099, -35),
              (2.897, 0.24, -26), (3.338, 0.44, -37), (3.741, 0.23, -27.5)]
# colour of the nostrils' noise: (frequency [Hz], gain [dB])
NOSE_COLOUR = [(90, -33), (140, -4), (190, 2), (270, -4), (420, -9.5), (750, -15), (1100, -22), (2000, -26),
               (3500, -32), (6000, -36), (7500, -52)]
# end of the rise and of the hold (shares of length); start and end against the puff's level (dB)
PUFF_RISE, PUFF_HOLD, PUFF_START_DB, PUFF_END_DB = 0.12, 0.44, -13.5, -13.5


def nose():
    """Turbulent flow noise: each puff rises quickly, holds and ebbs more slowly, with a little flutter."""
    flow = np.zeros(N)
    for start, length_s, db in NOSE_PUFFS:
        flow += curve([(start, db + PUFF_START_DB),
                       (start + PUFF_RISE * length_s, db),
                       (start + PUFF_HOLD * length_s, db),
                       (start + length_s, db + PUFF_END_DB)])
    return noise(NOSE_COLOUR) * undb(1.0 * walk(60)) * flow


# hollow tones: (start [s], end [s], start frequency [Hz], end frequency [Hz], level [dB])
WAVERING_TONES = [(0.66, 1.093, 162.1, 160, -37.5), (4.47, 4.613, 432, 448, -33.5),
                  (4.99, 5.32, 154.3, 147, -41.5), (5.145, 5.336, 1010, 887, -46),
                  (5.3, 5.61, 169, 189, -37), (5.28, 5.483, 493, 515, -43), (5.373, 5.472, 460, 418, -37),
                  (5.4, 5.797, 469, 458, -33.5), (5.497, 5.733, 550, 538, -39.5),
                  (5.475, 5.815, 878, 842, -43), (5.51, 5.748, 1045, 1123, -40.5),
                  (8.352, 8.642, 980, 908, -42.5)]


def hollow_tones():
    """Narrow-band modulation: gliding sinusoids fade in and out, wavering in strength and pitch."""
    out = np.zeros(N)
    waver = (walk(90) + 1j * walk(90) + 1) / np.sqrt(2)
    wander = 1 + .009 * walk(25) + .012 * walk(140)
    for start, end, start_hz, end_hz, db in WAVERING_TONES:
        n = max(int((end - start) * SR), 64)
        i = int(rng.random() * (N - n))  # a chance stretch of the modulation
        hz = np.linspace(start_hz, end_hz, n) * wander[i:i + n]
        phase = 2 * np.pi * np.cumsum(hz) / SR
        tone = (np.exp(1j * phase) * waver[i:i + n]).real
        add(out, undb(db) * unit(tone * signal.windows.tukey(n, .7)), start)
    return out


def scatter(x, t60_s, points):
    """Diffuse reflection: a short echo from ground and nearby plants, as decaying noise."""
    t = np.arange(SR // 3) / SR
    response = rng.standard_normal(len(t)) * np.exp(-np.log(1000) * t / t60_s)
    return colour(signal.fftconvolve(x, response / np.linalg.norm(response))[:N], points)


def scene():
    """Superposition: direct sounds in the centre; faint echoes and part of the hiss at the sides."""
    chewing = crunches() + munching() + cracks() + small_cracks(count=1)
    background = rumbles() + hollow_tones()
    puffs = nose()
    # echo colours: (frequency [Hz], gain [dB])
    echo = undb(-12.0) * scatter(chewing, t60_s=0.12,
                                 points=[(100, -42), (1500, 6.5), (6000, 2.5), (10000, 15.0)])
    side = scatter(chewing + puffs, t60_s=0.46,
                   points=[(200, -73), (600, -21), (1200, -29), (2200, -42), (3400, -42.5),
                           (5000, -40.0), (8000, -3.0), (15000, -4.0)])
    side += scatter(background, t60_s=0.14,
                    points=[(50, -59), (150, -81), (280, -70.0), (550, -10.0), (1500, -10.0)])
    return outdoors() + chewing + echo + background + puffs + side * LEFT_RIGHT


TOP_HZ = 15850


def record(dry):
    """Saturation and band-limiting: the recorder rounds the loudest peaks and cuts above TOP_HZ."""
    rounded = np.tanh(.7 * dry) / .7
    low_pass = signal.ellip(10, .2, 80, TOP_HZ, fs=SR, output="sos")
    return signal.sosfilt(low_pass, rounded)


dry = scene()
out = record(dry)
waveform_to_disk(out)
```